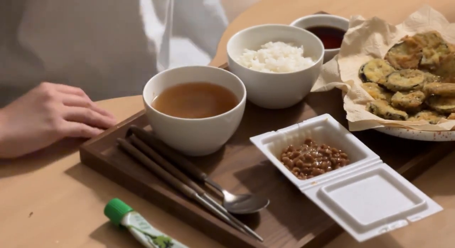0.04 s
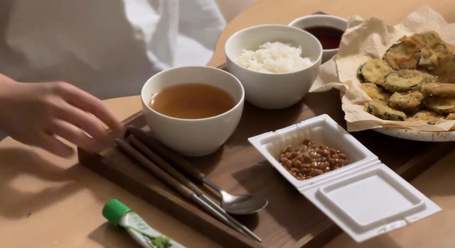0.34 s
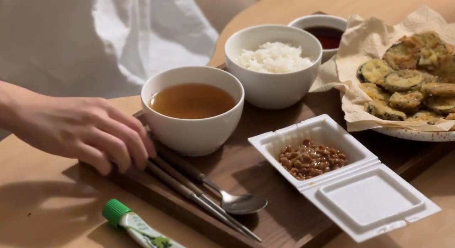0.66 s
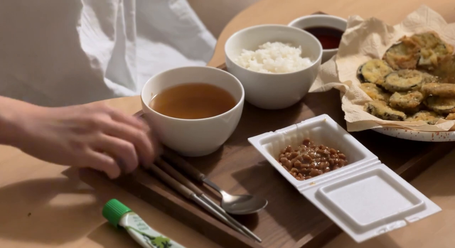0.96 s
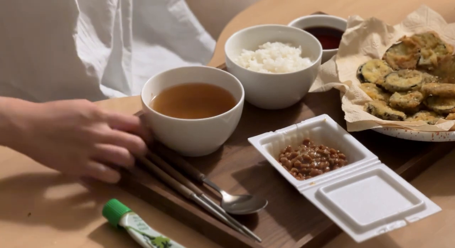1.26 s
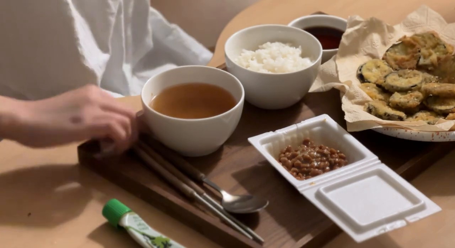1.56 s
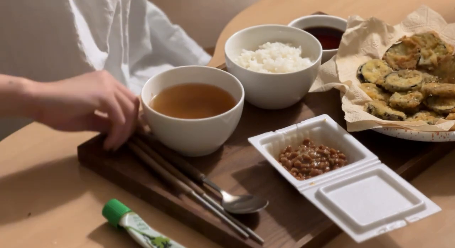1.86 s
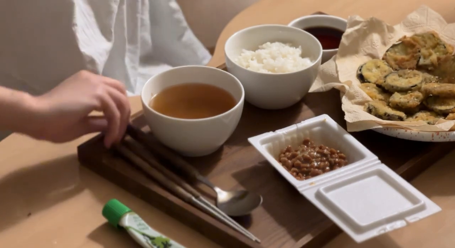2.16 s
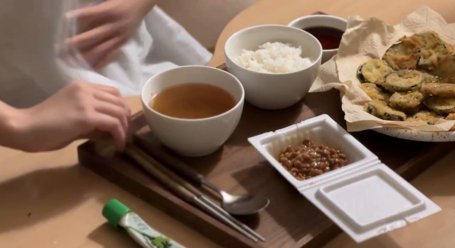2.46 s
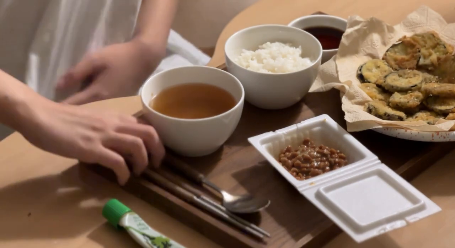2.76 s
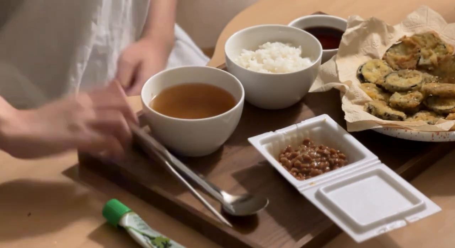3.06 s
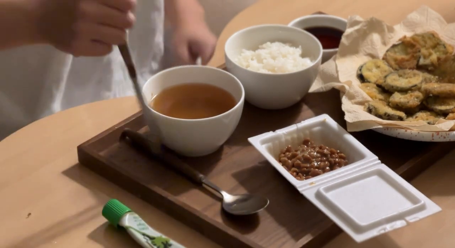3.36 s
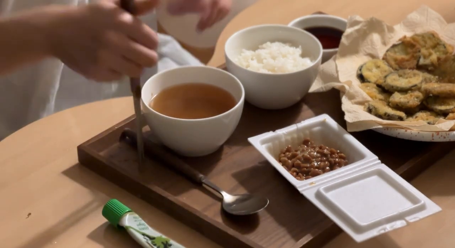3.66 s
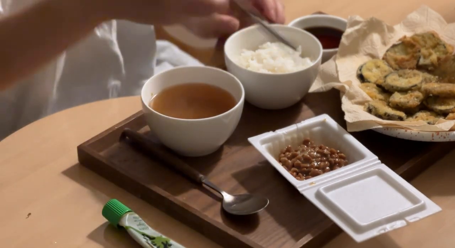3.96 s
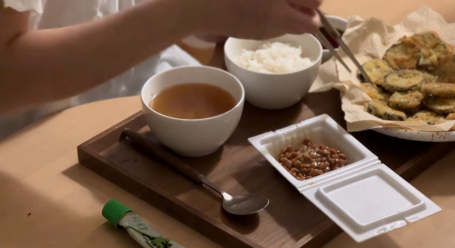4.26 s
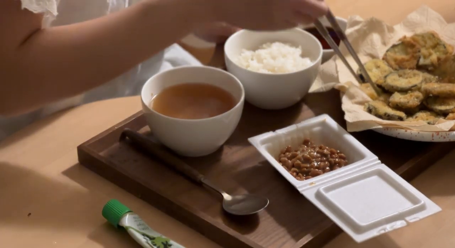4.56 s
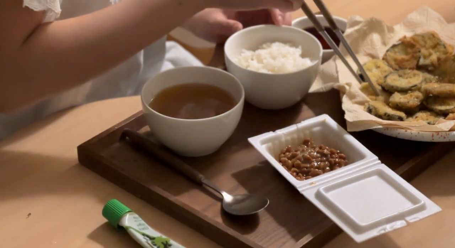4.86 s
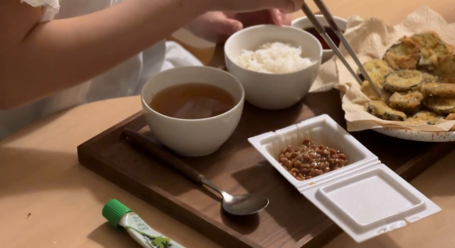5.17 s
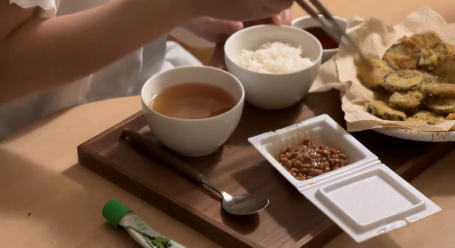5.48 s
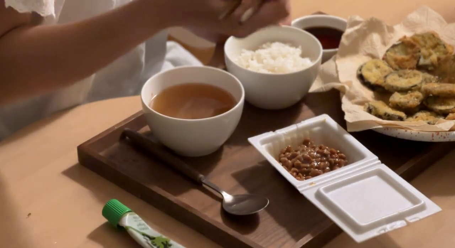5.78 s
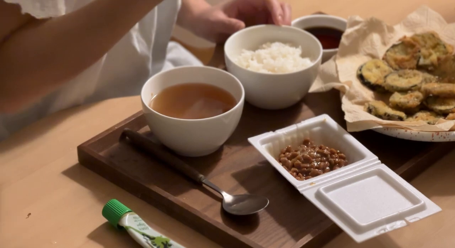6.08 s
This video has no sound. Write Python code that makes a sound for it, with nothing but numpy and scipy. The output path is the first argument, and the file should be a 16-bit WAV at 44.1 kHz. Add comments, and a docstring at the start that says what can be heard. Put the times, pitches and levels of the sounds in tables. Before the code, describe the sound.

Chopsticks rub, roll and clatter lightly on a wooden tray, the small knocks growing busier and mixed with thin metallic ticks. A short ringing clink on a china bowl follows, then a sharp double knock as the sticks are stood on the wood. Barely audible crackles of fried batter and paper come last. The microphone is close, in a small room with low, steady ventilation noise.

```python
"""Metal-tipped chopsticks, gathered from a wooden tray at a quiet dining table. They slide and knock on
the wood, setting sticks and tray ringing; the tips tick together and clink on a tea bowl. They are stood
on the tray to even their tips, graze a sauce bowl, then pick softly at fried food on paper.
A small furnished room with a low ventilation rumble, heard from close by on a pair of microphone ports."""
import sys
import numpy as np
from scipy import signal
from scipy.fft import rfft, irfft, next_fast_len
from scipy.io import wavfile
from scipy.ndimage import map_coordinates

SR = 44100
rng = np.random.default_rng(int(sys.argv[2]) if len(sys.argv) > 2 else 0)


def persist_wave(psi):
    """Save psi, clipped to +-1, as 16-bit WAV."""
    counts = np.round(np.clip(psi, -1, 1) * 32767).astype(np.int16)
    wavfile.write(sys.argv[1], SR, np.atleast_2d(counts).T)


N = 270219
T = np.arange(N) / SR
BLOW_T = T[:SR // 2]  # time axis of one blow

# colour of a contact on wood: freq_hz, gain_db
WOOD_CONTACT = [(80, -7.5), (200, 3.5), (400, 4.5), (750, 14.5), (1150, 13.5), (1600, 5), (2300, 5),
                (3300, 5.5), (5000, 3.5), (6800, 5), (8200, 9), (9500, 6.5), (12000, -7), (14000, -4.5),
                (16000, -3.5)]


def undb(db):
    """Decibels to gain."""
    return np.exp(np.log(10) / 20 * np.asarray(db))


def unit(x):
    """Scale to rms 1."""
    return x / np.sqrt(np.mean(x ** 2))


def add(out, start_s, x):
    """Mix x into out from start_s on."""
    i = int(start_s * SR)
    out[i:i + len(x)] += x[:N - i]


def colour(x, points):
    """Causal filter through (freq_hz, gain_db) points, built from the cepstrum of its gain."""
    size = next_fast_len(x.shape[-1] + 2048, True)
    hz, db = np.transpose(points)
    gain = undb(np.interp(np.log(np.fft.rfftfreq(size, 1 / SR) + 1), np.log(hz), db))
    cepstrum = irfft(np.log(gain), size)
    cepstrum[1:size // 2] *= 2
    cepstrum[size // 2:] = 0
    return irfft(rfft(x, size) * np.exp(rfft(cepstrum, size)), size)[..., :x.shape[-1]]


def wander(rate_hz):
    """Random levels, rate_hz of them a second, joined smoothly; spread near 1."""
    return map_coordinates(rng.standard_normal(256), [T * rate_hz], order=3, mode="wrap")


def ventilation(rumble_db=-52, air_db=-66, surge_db=.8):
    """A rumble that swells and sinks at random, nearly alike at both ports, and a diffuse rush of air."""
    # colours of the rumble and of the rush: freq_hz, gain_db
    rumble = [(15, -40), (30, -25.5), (48, -0.5), (64, 4.5), (80, -5), (110, -8), (150, -15.5),
              (220, -19.5), (300, -21.5), (450, -29), (900, -74.5)]
    air = [(200, -20), (450, -3), (620, 0.5), (860, 6.5), (1100, -2), (1500, -4.5), (1850, -16),
           (2300, -27), (5000, -33.5), (7500, -27), (10300, -32.5), (12000, -43), (16000, -45)]
    # stereo width: freq_hz, side_db
    width = [(60, -26.0), (130, -13.5), (300, -10.5), (800, 0.5), (1400, -6.0), (2200, -18.5)]
    out = 0
    for spectrum, db in (rumble, rumble_db + surge_db * wander(rate_hz=1.4)), (air, air_db):
        mid, side = unit(colour(rng.standard_normal((2, N)), spectrum))
        side = colour(side, width)
        out = out + undb(db) * np.array([mid + side, mid - side])
    return out


def grains(spread_db):
    """Friction as dense tiny clicks of uneven size, 32 samples each."""
    size = np.minimum(rng.exponential(size=N // 32 + 1), 4)
    return unit(rng.standard_normal(N) * undb(spread_db * np.repeat(size, 32)[:N]))


def sliding(slide_db=-4.5, attack_s=0.026, release_t60=0.2):
    """Hand and chopsticks hiss over the wood grain in strokes, brighter where the tips drag."""
    # strokes over the tray: start_s, length_s, level_db, treble_db
    strokes = [(0, 0.14, -59.5, -10.5), (1.416, 0.085, -68, -14), (1.62, .21, -67, -13),
               (1.835, .24, -63, -10), (2.459, .29, -64, -1.5), (2.768, 0.23, -55.5, -20),
               (3.12, 0.066, -86, 11.5)]
    # colour of rubbed wood: freq_hz, gain_db
    rub = [(300, -13.5), (1200, 4), (2800, 2), (5200, 0), (6800, 3.5), (9500, 6), (12000, -1.5),
           (15000, 3.5), (16000, -3.5)]
    hiss = colour(grains(spread_db=1.5), rub)
    low = signal.sosfiltfilt(signal.butter(2, 8000, fs=SR, output="sos"), hiss)
    out = np.zeros(N)
    for start_s, length_s, db, treble_db in strokes:
        attack = np.clip((T - start_s) / attack_s, 0, 1)
        release = undb(-60 * np.maximum(T - start_s - length_s, 0) / release_t60)
        out += undb(db) * attack * release * (low + undb(treble_db) * (hiss - low))
    return undb(slide_db) * out


def swell(noise, peak_s, sigma_s):
    """A bell-shaped stretch of noise around peak_s: its start time and its samples."""
    inside = (T > peak_s - 3 * sigma_s) & (T < peak_s + 3 * sigma_s + .02)
    bell = np.exp(-.5 * ((T[inside] - peak_s) / sigma_s) ** 2)
    return T[inside][0], noise[inside] * bell


def touch(x, db, contact_ms, body_db=0):
    """Treble falls 12 dB an octave above 1 / contact time; the tray's body lifts or cuts the lows."""
    hz = np.geomspace(400, 11500, 14)
    rolloff_db = -20 * np.log10(1 + (hz * contact_ms / 1000) ** 2)
    low_shelf = np.interp(np.log(hz), np.log([800, 2100]), [1, 0])
    return colour(x, np.column_stack([hz, db + rolloff_db + body_db * low_shelf]))


def brushing(brush_db=-4):
    """Fingers brush the tray and roll the sticks: short, dull swells of friction."""
    # finger brushes: peak_s, sigma_s, level_db, contact_ms
    brushes = [(0.497, .008, -59, 0.31), (0.832, 0.016, -54.5, 0.74), (1.148, .007, -60, 0.37),
               (1.45, 0.032, -52, 0.49), (1.61, 0.022, -51.5, 0.47), (1.945, 0.052, -49, 0.41),
               (2.008, 0.024, -45.5, 1), (2.32, 0.044, -59, 0.42), (2.627, 0.0094, -43.5, 1),
               (2.87, 0.021, -49.5, 0.61), (3.052, 0.012, -51, 0.14), (3.987, 0.048, -68.5, 0.33)]
    out, friction = np.zeros(N), grains(spread_db=4.5)
    for peak_s, sigma_s, db, contact_ms in brushes:
        start_s, brush = swell(friction, peak_s, sigma_s)
        add(out, start_s, touch(brush, db, contact_ms))
    return undb(brush_db) * colour(out, WOOD_CONTACT)


def fade(t60):
    """Exponential decay over one blow, 60 dB down after t60 seconds."""
    return undb(-60 * BLOW_T / t60)


def rise(rise_s):
    """Smooth onset of one blow, from 0 to 1."""
    return 1 - np.exp(-(BLOW_T / rise_s) ** 2)


def burst(t60, rise_s):
    """A swelling, then decaying burst of noise with energy 1."""
    x = rng.standard_normal(len(BLOW_T)) * fade(t60) * rise(rise_s)
    return x / np.linalg.norm(x)


def ring(modes):
    """Decaying modes, all struck at once."""
    return sum(undb(db) * fade(t60) * np.sin(2 * np.pi * hz * BLOW_T) for hz, db, t60 in modes)


def strike(modes, scatter_db, detune):
    """Where a blow lands and how the fingers hold change each mode's share, sign and pitch."""
    chance = rng.uniform(-1.2, 1, (len(modes), 3))
    return sum(np.sign(sign) * ring([(hz * (1 + detune * shift), db + scatter_db * share, t60)])
               for (hz, db, t60), (share, shift, sign) in zip(modes, chance))


def knocks(crack_db=25.5, stick_db=-2, crack_t60=0.019, grip_t60=0.37, tray_hold_t60=0.21):
    """Each knock is a crack of wood that sets stick and tray ringing; fingers and resting tips damp them."""
    # chopsticks landing on the tray: start_s, level_db, contact_ms, body_db
    blows = [(.846, -54.5, 0.45, -5.5), (1.158, -53.5, 0.092, 5.5), (1.421, -59, 0.13, 5.5),
             (1.434, -50, 0.11, -5.5), (1.457, -46, 0.2, 0.5), (1.612, -42, 0.29, 1.5),
             (1.758, -28, 0.37, -14), (1.941, -49, 0.21, 3.5), (1.957, -37, 0.42, -3),
             (1.964, -52.5, 0.044, 4.5), (2.042, -54.5, 0.055, 0.5), (2.297, -54, 0.36, 0.5),
             (2.311, -44, 0.59, -3.5), (2.318, -41.5, 0.77, -9), (2.357, -48, 0.18, -2),
             (2.482, -51.5, 0.016, -1), (2.62, -53, 0.38, 9.5), (2.672, -40, 0.019, -1),
             (2.814, -43, 0.16, -8.5), (2.842, -38, 0.14, -13.5), (2.904, -54, 0.12, 4),
             (2.917, -35.5, 0.035, -7), (3.002, -37.5, 0.21, -11.5), (3.043, -42.5, 0.23, -11.5),
             (3.471, -21, 0.52, -6.5), (3.487, -32, 0.46, -2.5)]
    # modes of a held chopstick and of the tray, before the extra damping: pitch_hz, level_db, t60_s
    stick_modes = [(1269, -3, 0.11), (1746, -0.5, 0.054), (2280, -1, 0.047), (3109, -0.5, 0.041),
                   (4597, 5.5, 0.035), (6440, -12, 0.021)]
    tray_modes = [(303, -20, .2), (537, -10, .19), (672, -12, .21), (713, -12, .26), (777, -10, .17),
                  (833, 0, .13), (897, -9, .17), (984, -10, .17), (1092, -11, .15), (1157, -14, .18),
                  (1300, -15, .15), (1427, -11, .13), (1499, -13, .14), (1660, -12, .12), (1905, -11, .12),
                  (2089, -9, .11), (2340, -13, .1)]
    shortest_push_s, softness = 0.0017, .15
    hardest_db = max(blow[1] for blow in blows)
    cracks, sticks, tray = np.zeros((3, N))
    for start_s, db, contact_ms, body_db in blows:
        push_s = shortest_push_s * undb(softness * (hardest_db - db))  # a gentler blow pushes for longer
        stick = strike(stick_modes, scatter_db=6, detune=0.073)
        stick = touch(stick, db + stick_db, contact_ms, body_db)
        body = undb(db + body_db) * strike(tray_modes, scatter_db=-1.5, detune=0)
        add(cracks, start_s, touch(burst(crack_t60, push_s), db, contact_ms, body_db))
        add(sticks, start_s, rise(push_s) * fade(grip_t60) * stick)
        add(tray, start_s, rise(push_s) * fade(tray_hold_t60) * body)
    return undb(crack_db) * colour(cracks, WOOD_CONTACT), sticks, tray


def tip_taps(tick_db=22):
    """Metal tip on metal tip: a thin, very high tick."""
    # the tips meet: start_s, level_db
    taps = [(1.759, -41), (1.964, -38), (2.672, -43), (2.917, -34)]
    # colour of the tick: freq_hz, gain_db
    metal = [(6000, -36), (11500, -20), (13200, -6.5), (14200, 0), (15500, -16.5)]
    out = np.zeros(N)
    for start_s, db in taps:
        add(out, start_s, undb(db + tick_db) * burst(t60=.06, rise_s=.0005))
    return colour(out, metal)


def bowl_clinks(click_db=22):
    """The tips clip the tea bowl and later graze the sauce bowl: a click, then the china rings."""
    # modes of the tea bowl, with close twins that beat, and the sauce bowl: pitch_hz, level_db, t60_s
    tea_bowl = [(1303, -14, .09), (1297, -37, 1), (1302, -37, 1), (3402, -10, .33), (3418, -20, .2),
                (6125, -7, .14), (6163, -7.5, .26), (6167, -7.5, .26), (6447, -17, .16), (6564, -17, .14),
                (6642, -20, .13), (7036, -21, .14), (9418, -16, .22), (9534, -16, .2), (13285, -15, .12),
                (14050, -6, .04)]
    sauce_bowl = [(1673, 9.5, 0.26), (4390, 3, 0.16), (4440, 1, 0.1), (12070, -18.5, .15)]
    # colour of metal on china: freq_hz, gain_db
    china = [(300, -24.5), (1300, -7.5), (2200, -18.5), (3400, -4), (5200, -4.5), (6400, 3), (7200, 1.5),
             (8100, 10.5), (9600, 2), (11500, -9), (12700, -10), (13900, 7), (15500, -6)]
    onset = 1 - np.exp(-BLOW_T / 0.00058)
    clicks, tones = np.zeros((2, N))
    for start_s, db, modes in (3.3108, -22, tea_bowl), (4.063, -75, sauce_bowl):
        add(clicks, start_s, undb(db + click_db) * colour(burst(t60=.01, rise_s=0.00014), china))
        add(tones, start_s, undb(db) * ring(modes) * onset)
    return clicks, tones


def food_crackle(crackle_db=-1):
    """Crisp batter and paper give way under the tips in little clusters of grains."""
    # pinches of fried food and thin, bright ticks of paper: peak_s, level_db
    pinches = [(4.379, -80), (4.824, -69), (5.05, -80), (5.195, -66), (5.325, -75), (5.365, -73),
               (5.44, -82), (5.705, -82)]
    paper_ticks = [(5.615, -89), (5.76, -76.5), (5.985, -90)]
    # colour of the crackle: freq_hz, gain_db
    crust = [(600, -7), (2000, 0), (3600, -1.5), (6000, -7.5), (10000, -1.5), (12500, -16), (14500, -10),
             (16000, -17)]
    out, crisp = np.zeros(N), grains(spread_db=3.5)
    for events, sigma_s, treble_db in (pinches, 0.016, -3), (paper_ticks, 0.0056, 20.5):
        for peak_s, db in events:
            start_s, cluster = swell(crisp, peak_s, sigma_s)
            add(out, start_s, colour(cluster, [(5000, db), (10000, db + treble_db)]))
    return undb(crackle_db) * colour(out, crust)


def room(x, wet_db, low_t60=0.24, high_t60=0.16):
    """Direct sound plus a small furnished room; the tail is wider and longer in the lows."""
    noise = rng.standard_normal((2, len(BLOW_T)))
    low = signal.sosfiltfilt(signal.butter(2, 2500, fs=SR, output="sos"), noise)
    tail = (low * fade(low_t60) + (noise - low) * fade(high_t60)) * rise(0.005)
    mid, side = undb(wet_db) * tail / np.linalg.norm(tail[0])
    side = colour(side, [(600, -2.0), (1500, -8), (3000, -26.5), (8000, -21.0)])
    return x + signal.fftconvolve(x[None], np.array([mid + side, mid - side]))[:, :N]


def microphone_ports(x):
    """Sound reaches the two ports with a phase difference that depends on pitch."""
    # phase by which the left port leads: freq_hz, lead_rad
    left_lead = [(0, 0), (1100, -.3), (2000, 0), (3300, .62), (4300, .53), (5500, 0), (6400, .03),
                 (7000, .6), (7900, 2.9), (8300, 3.14), (8750, 2.8), (9300, 1.5), (11300, 0), (12700, -.1),
                 (15500, -2.2)]
    size = next_fast_len(N)
    lead = np.interp(np.fft.rfftfreq(size, 1 / SR), *np.transpose(left_lead))
    return irfft(rfft(x, size) * np.exp(.5j * np.array([lead, -lead])), size)[:, :N]


def scene():
    """The table from close by: each sound with its own share of the room, over the ventilation."""
    cracks, sticks, tray = knocks()
    clicks, bowl_tones = bowl_clinks()
    mix = room(cracks + sliding() + brushing(), wet_db=-2)
    mix += room(sticks + food_crackle() + tip_taps(), wet_db=-6.5)
    mix += room(clicks, wet_db=-1)
    mix += room(bowl_tones + tray, wet_db=-12.5)
    return microphone_ports(mix + ventilation())


def record(dry, top_hz=15900):
    """The recorder cuts the top steeply."""
    return signal.sosfilt(signal.ellip(8, .2, 70, top_hz, fs=SR, output="sos"), dry)


dry = scene()
out = record(dry)
persist_wave(out)
```